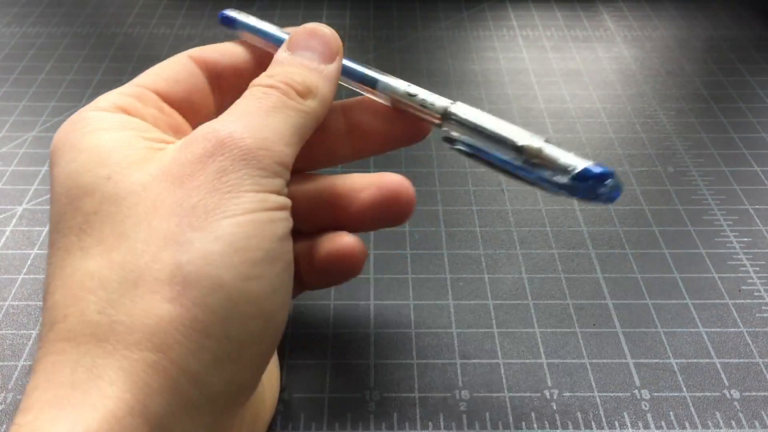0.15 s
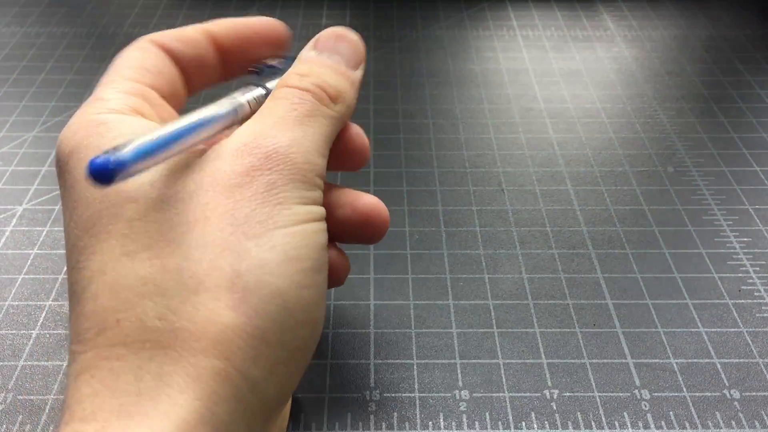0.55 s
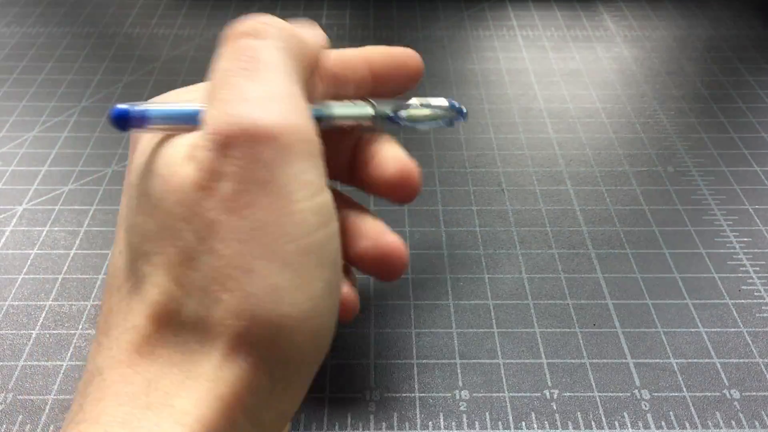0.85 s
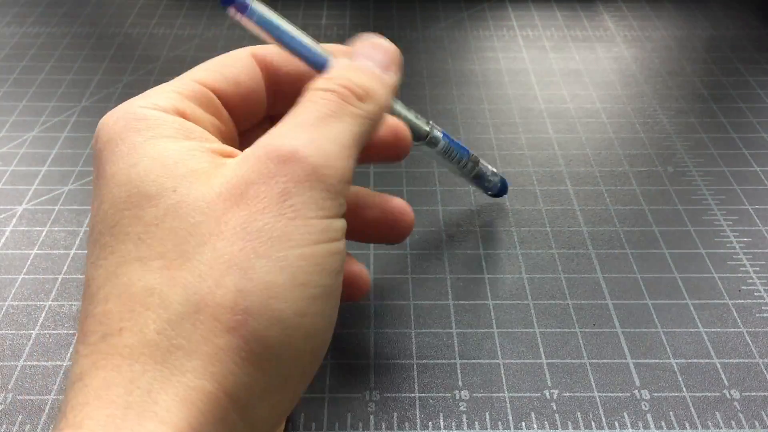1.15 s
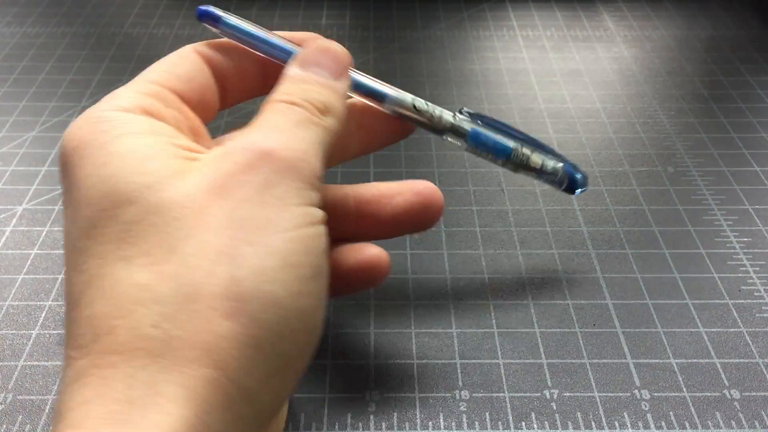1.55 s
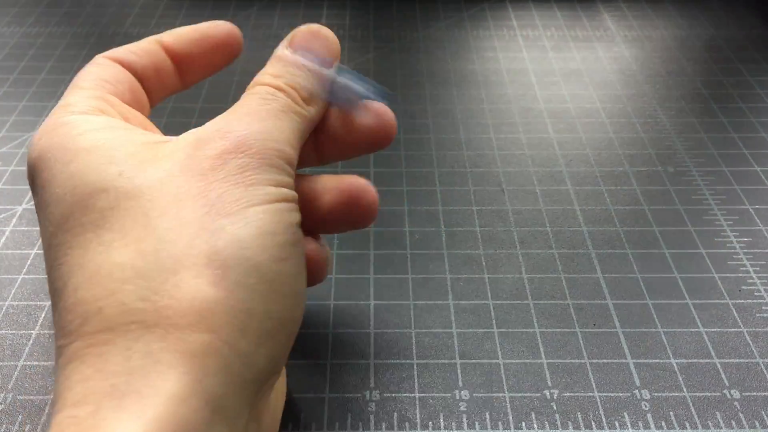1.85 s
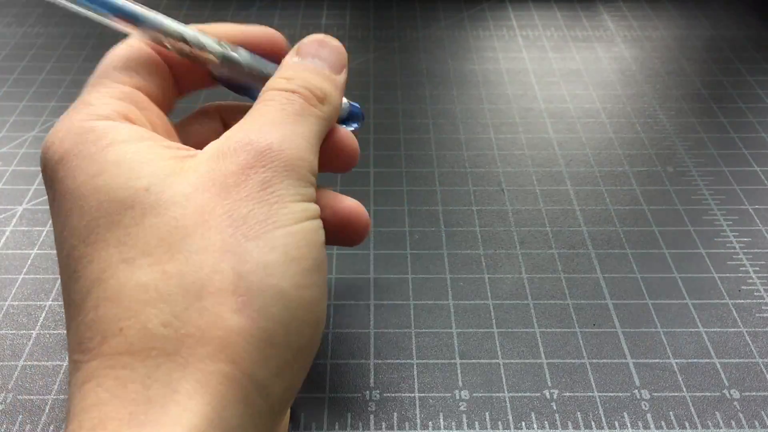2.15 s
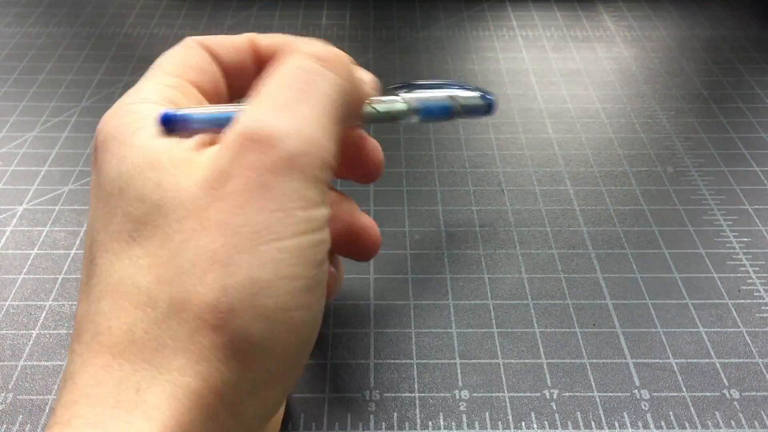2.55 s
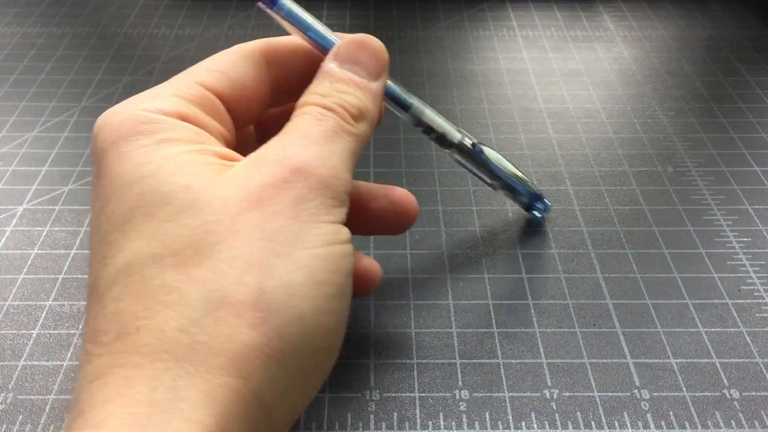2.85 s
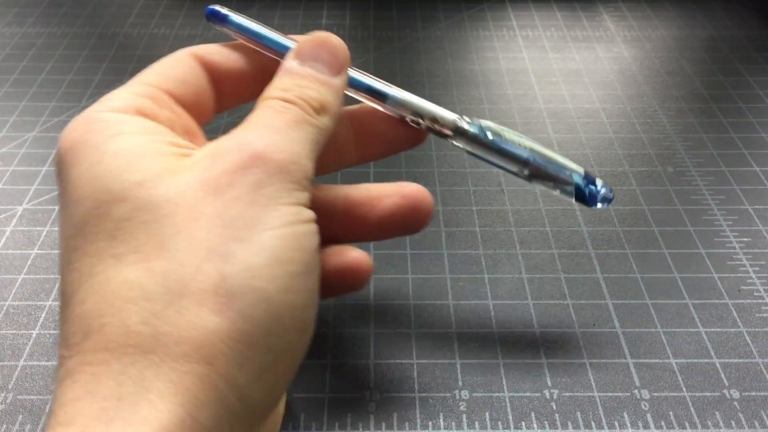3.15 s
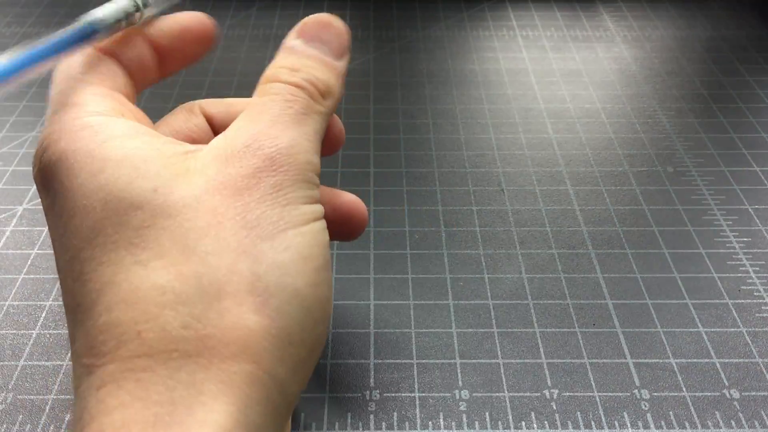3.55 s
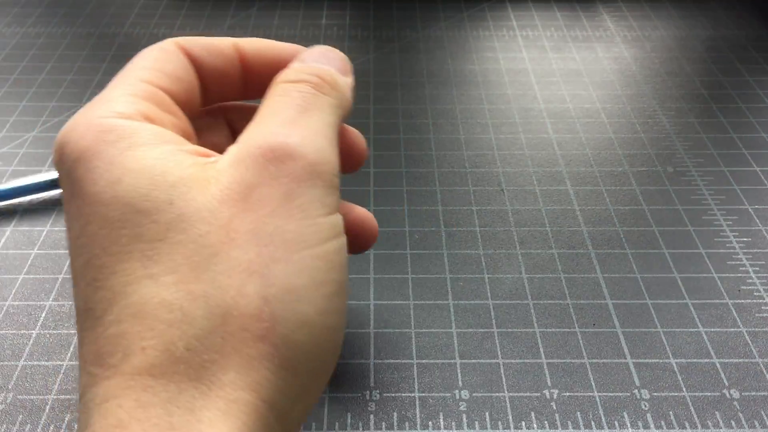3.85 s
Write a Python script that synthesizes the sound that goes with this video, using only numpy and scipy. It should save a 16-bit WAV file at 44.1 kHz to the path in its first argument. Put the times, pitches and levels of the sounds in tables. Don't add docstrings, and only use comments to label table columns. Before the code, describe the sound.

Light plastic pen clicks and soft taps over quiet room hum, ending in a sharp double clack

```python
import sys
import numpy as np
from scipy import signal
from scipy.fft import rfft, irfft
from scipy.io import wavfile
from scipy.ndimage import uniform_filter1d

SR = 44100
rng = np.random.default_rng(int(sys.argv[2]) if len(sys.argv) > 2 else 0)


def put_to_file(sound):
    columns = np.atleast_2d(sound).T
    safe = np.clip(columns, -1, 1)
    whole_steps = np.round(safe * 32767)
    wavfile.write(sys.argv[1], SR, whole_steps.astype(np.int16))


def volts(x):
    e = np.asarray(x, float) / 20
    return 10 ** e


N = 176400


def unit(x):
    return x / np.sqrt(np.mean(x ** 2))


def band(x, hz, width_hz):
    return signal.lfilter(*signal.iirpeak(hz, hz / width_hz, fs=SR), x)


def walk(rate_hz):
    k = int(SR / rate_hz)
    steps = np.repeat(rng.standard_normal(N // k + 1), k)
    return 1.3 * uniform_filter1d(uniform_filter1d(steps, k), k)[:N]


def decay(t, t60):
    return np.exp(-np.log(1000) * t / t60)


def ring(modes, gains, size):
    hz, db, t60 = np.array(modes).T[:, :, None]
    t = np.arange(size) / SR
    return np.sum(gains[:, None] * volts(db) * np.sin(2 * np.pi * hz * t) * decay(t, t60), axis=0)


def add(out, s, x):
    i = int(round(s * SR))
    out[i:i + len(x)] += x[:N - i]


# [f/Hz, level/dB per Hz]
ROOM_TONE = [(15, -21), (25, -20), (53, -1.5), (192, -8), (496, -24), (877, -26), (4860, -39.5),
             (14800, -45), (16500, -49)]


def air():
    dip_hz, dip_width_hz, dip_db = 10600, 500, -3.5
    level_db, swell_db, flicker_db = -59.5, -0.27, 0.42
    f = np.fft.rfftfreq(N, 1 / SR) + 1
    tone_hz, tone_db = np.array(ROOM_TONE).T
    dip = dip_db * np.exp(-.5 * ((f - dip_hz) / dip_width_hz) ** 2)
    shape = volts(np.interp(np.log(f), np.log(tone_hz), tone_db) + dip)
    noise = rfft(rng.standard_normal(N)) * shape
    swell = walk(1.5)
    out = np.zeros(N)
    for k in range(20):
        part = np.clip(1 - np.abs(2 * np.log2(f / 25) - k), 0, 1)
        out += irfft(noise * part, N) * volts(swell_db * swell + flicker_db * walk(9.53))
    return volts(level_db) * unit(out)


# [f/Hz, width/Hz, level/dB]
APPLIANCE_HUM = [(60.2, 26, -61), (123.75, 11.6, -68.5), (187, 13.6, -65.5), (879, 97, -81.5)]


def hum():
    out = np.zeros(N)
    for hz, width_hz, db in APPLIANCE_HUM + [(15300, 150, -90)]:
        noise = rng.standard_normal(N)
        out += volts(db) * unit(band(band(noise, hz, width_hz), hz, width_hz))
    return out


# [f/Hz, t60/s, level/dB]
WALLS = [(268, 0.28, -23), (740, 0.2, -27), (1500, 0.13, -17), (2400, 0.34, -21), (4500, .4, -21),
         (7500, 0.41, -34), (13000, 0.13, -17)]


def room(x):
    early_t60_s, early_db = 0.15, -46.5
    t = np.arange(22050) / SR
    tail = np.zeros(len(t))
    for hz, t60, db in WALLS:
        tail += volts(db) * unit(band(rng.standard_normal(len(t)), hz, hz * 0.71)) * decay(t, t60)
    tail *= np.clip(t / 0.002, 0, 1)
    early = volts(early_db) * rng.standard_normal(len(t)) * decay(t, early_t60_s) * (t > .0015)
    return signal.fftconvolve(x, (tail + early) * 0.089)[:N]


# [t/s, length/s, level/dB, f/Hz, width/Hz]
SLIDES = [(0.337, .04, -78, 5300, 1200), (0.345, 0.017, -74, 5320, 300), (0.334, 0.043, -78, 11600, 6000),
          (0.46, 0.032, -73.5, 13900, 4000), (1.0, .06, -72.5, 12800, 7000),
          (1.493, 0.07, -60.5, 2100, 2840), (1.543, 0.032, -53, 1580, 1500),
          (1.552, 0.038, -71, 11000, 9000), (1.916, 0.042, -81, 13000, 4000),
          (2.012, 0.028, -79, 14100, 4000), (2.58, 0.077, -77.5, 12500, 6000),
          (3.014, 0.076, -67, 2400, 600), (3.104, 0.02, -63.5, 1900, 2500),
          (3.502, 0.017, -71, 14100, 4000), (3.542, 0.037, -74, 12500, 6000), (.8, 0.029, -72.5, 580, 78),
          (1.987, 0.027, -67.5, 567, 80)]


def rubs():
    grit_db = 2.5
    out = np.zeros(N)
    for s, length, db, hz, width_hz in SLIDES:
        grit = volts(grit_db * np.repeat(rng.exponential(size=200), 40))
        noise = rng.standard_normal(8000) * grit
        stroke = np.sin(np.pi * np.clip(np.arange(8000) / SR / length, 0, 1))
        add(out, s, volts(db) * unit(band(band(noise, hz, width_hz), hz, width_hz * 2)) * stroke)
    return out


# [f/Hz, level/dB, t60/s]
DESK_MODES = [(89.2, -42, 0.044), (227, -49.5, 0.36), (278.2, -35, 0.041), (328.5, -29, 0.04),
              (518, -33, 0.087), (605, -27.5, 0.02), (760, -31, 0.027)]


def desk(hits, thud_db):
    out, thud = np.zeros(N), ring(DESK_MODES, np.ones(len(DESK_MODES)), size=9000)
    for s, db, *_ in hits:
        add(out, s, volts(db + thud_db) * thud)
    return out


# [f/Hz, level/dB, t60/s]
BARREL = [(1020, -2, 0.086), (1350, -8.5, 0.09), (1760, 7, 0.01), (2076, -4, 0.055), (2410, 4.5, 0.013),
          (2754, -2, 0.022), (3260, -6, 0.02), (3550, 1, 0.017), (4230, 8, 0.0067), (5320, -2.5, 0.024),
          (6010, 2.5, 0.014), (7000, -1, .015), (9100, -2, 0.013), (13200, -6, 0.011)]


def pen(hits, dull_hz, wet_db):
    favour_oct, scatter_db = .35, 2
    modes_db, sent_modes_db = -11.5, -10
    rebound_s, rebound_db = .0009, -5
    linger_s, linger_db = .005, -20
    out, sent, t = np.zeros(N), np.zeros(N), np.arange(2600) / SR
    hz = np.array(BARREL)[:, 0]
    signs = (-1) ** np.arange(len(hz))
    sharp = np.vstack([signal.butter(2, 4000, "high", fs=SR, output="sos"),
                       signal.butter(1, dull_hz, fs=SR, output="sos"),
                       signal.butter(6, 15900, fs=SR, output="sos")])
    click = signal.sosfilt(sharp, 1. * (t == 0))
    for s, db, favour_hz, treble_db, chatter_s in hits:
        luck = volts(scatter_db * rng.standard_normal(len(hz)))
        near = np.exp(-.5 * (np.log2(hz / favour_hz) / favour_oct) ** 2) * luck
        modes = volts(modes_db) * ring(BARREL, near * signs, size=len(t))
        knock = ring([(favour_hz, 0, 3.3 / favour_hz)], np.ones(1), size=len(t))
        knock = signal.lfilter(*signal.butter(3, 0.43 * favour_hz, "high", fs=SR), knock)
        fade = np.exp(-t / chatter_s) + volts(linger_db) * np.exp(-t / linger_s)
        chatter = volts(treble_db + 1) * fade * signal.sosfilt(sharp, rng.standard_normal(len(t)))
        add(out, s, volts(db) * (knock + modes + chatter))
        add(out, s + rebound_s, volts(db + rebound_db) * knock)
        tick = volts(treble_db + 1 + wet_db) * click * np.sqrt(np.sum(fade ** 2))
        add(sent, s, volts(db) * (knock + volts(sent_modes_db) * modes + tick))
    return np.array([out, sent])


# [t/s, level/dB, favoured f/Hz, treble/dB, chatter/s]
SPIN_CLICKS = [(.5176, -42, 3550, 7.5, 0.00038), (.5178, -47, 1850, -20, 0.00044),
               (0.6526, -35.5, 4900, -3, 0.0012), (.6526, -44, 2000, -22.5, .0005),
               (.6524, -38.5, 3450, -18, 0.00035), (1.4734, -25.5, 1690, -3, 0.0007),
               (1.4738, -25.5, 3700, -15, 0.00059), (1.487, -44, 3500, -24, 0.0008),
               (1.5535, -42, 2980, -11, 0.00082), (1.5605, -50.5, 1970, 5, 0.00091),
               (1.5671, -49, 1700, -3, .001), (1.5735, -57.5, 9000, 8, 0.0012),
               (2.2045, -66, 6500, 4, 0.00056), (2.271, -53, 8700, -22, .0005),
               (2.9266, -41, 2180, -14, 0.00072), (2.9984, -21, 2870, -8.5, .0004),
               (3.0008, -30, 1560, -28, 0.00027), (3.0078, -50, 2000, -3, .003),
               (3.1161, -55, 1780, -8, 0.00088), (3.5525, -60, 3200, -1, .0005)]


def spin():
    return pen(SPIN_CLICKS, dull_hz=19000, wet_db=-5) + desk(SPIN_CLICKS, thud_db=-6.5)


# [t/s, level/dB, favoured f/Hz, treble/dB, chatter/s]
LANDINGS = [(3.8357, -62.5, 4800, 18.5, 0.00019), (3.8479, -3, 2620, -14.5, 0.0018),
            (3.8485, -13.5, 1350, -21, .001), (3.859, -5.5, 4900, -2, 0.0028),
            (3.862, -6.5, 2650, -7.5, 0.0018), (3.8704, -13.5, 2480, -1, 0.00057),
            (3.9592, -16, 4540, -16, 0.003), (3.9657, -9.5, 3830, -13.5, 0.0028),
            (3.966, -11.5, 1290, -42, .001), (3.9715, -11.5, 1020, -35, 0.0011),
            (3.9789, -43, 4500, -10, 0.00077)]


def fall():
    return pen(LANDINGS, dull_hz=11000, wet_db=0) + desk(LANDINGS, thud_db=0)


def scene():
    hits, sent = spin() + fall()
    slides = rubs()
    soft = slides + room(sent + slides) + air() + hum()
    below_top = signal.ellip(8, .3, 60, 15850, fs=SR, output="sos")
    return (hits + signal.sosfilt(below_top, soft))[None]


def roll_off(x):
    return signal.sosfilt(signal.butter(12, 16640, fs=SR, output="sos"), x)


def record(dry):
    mix = signal.lfilter(*signal.butter(2, 42, "high", fs=SR), dry)
    return roll_off(mix)


dry = scene()
out = record(dry)
put_to_file(out)
```